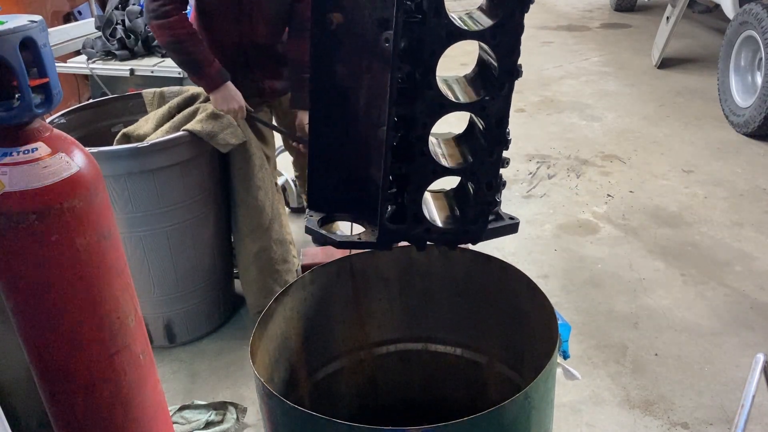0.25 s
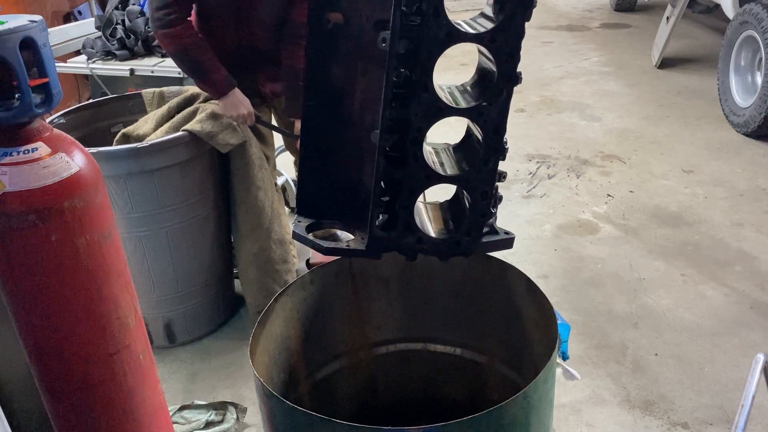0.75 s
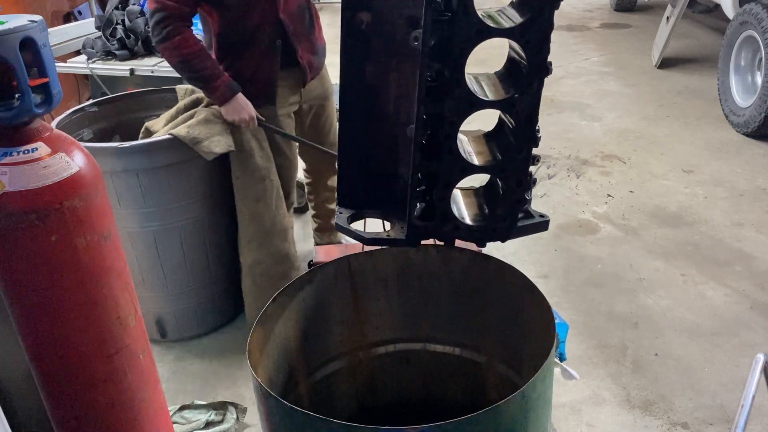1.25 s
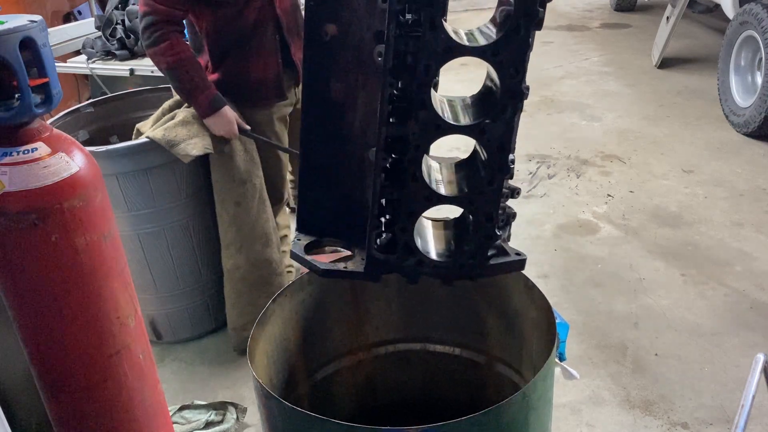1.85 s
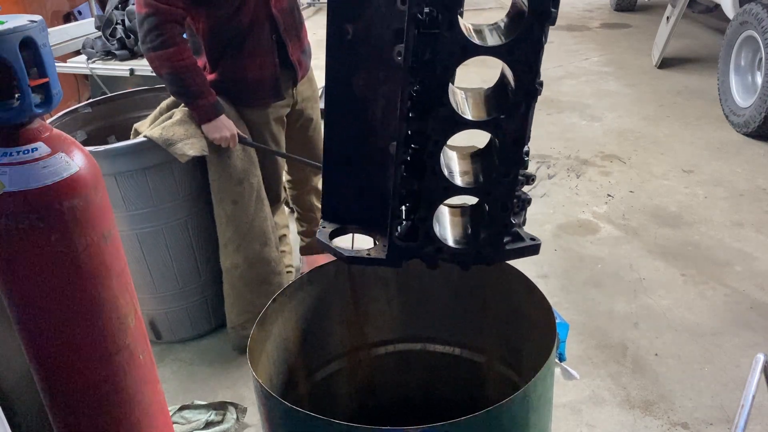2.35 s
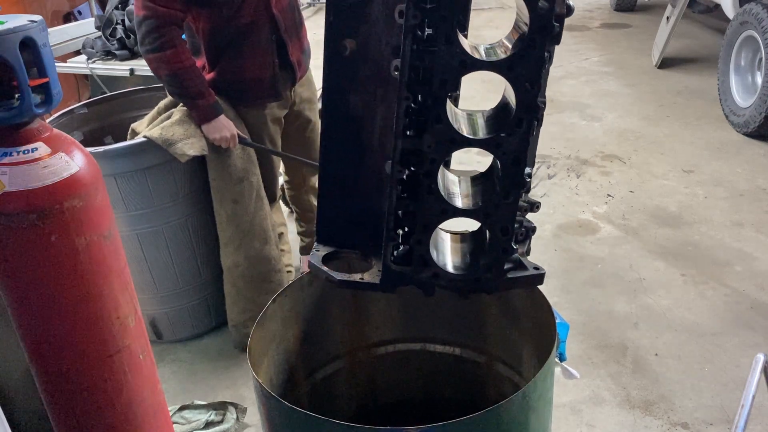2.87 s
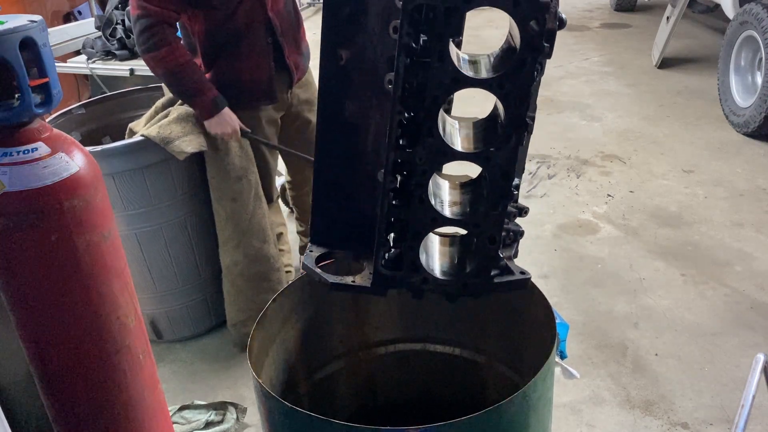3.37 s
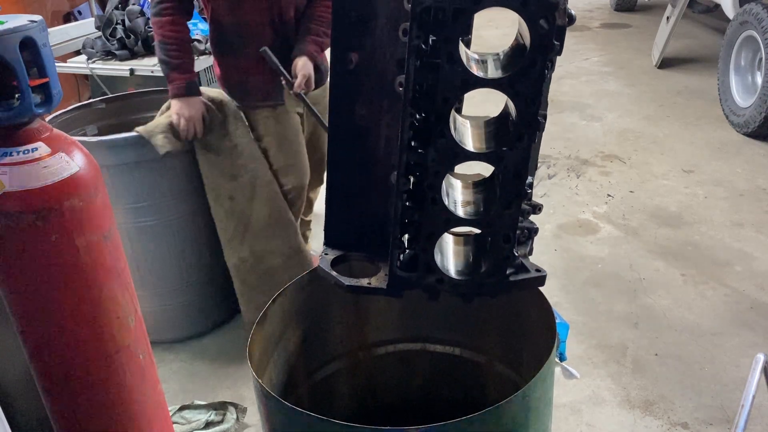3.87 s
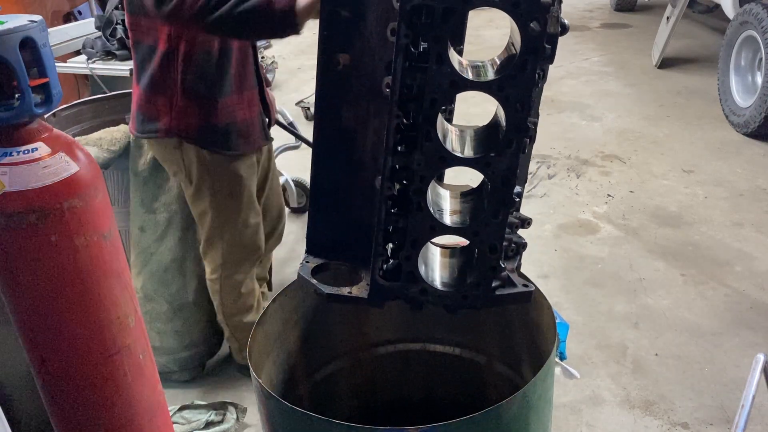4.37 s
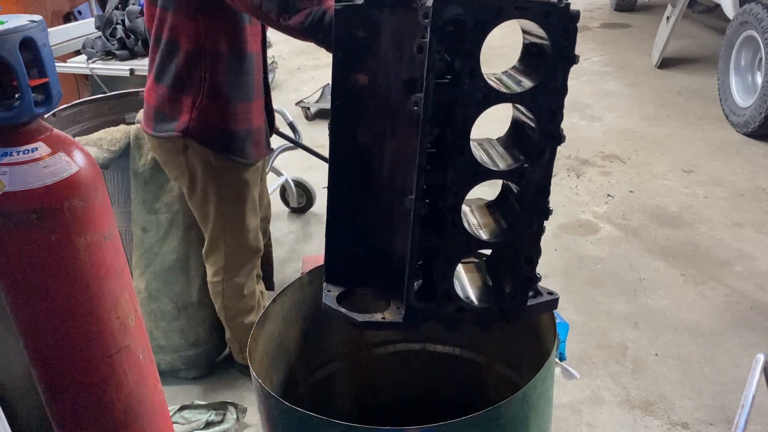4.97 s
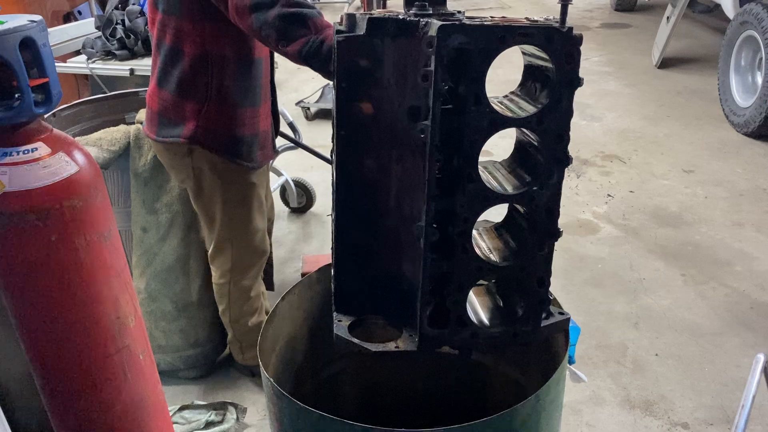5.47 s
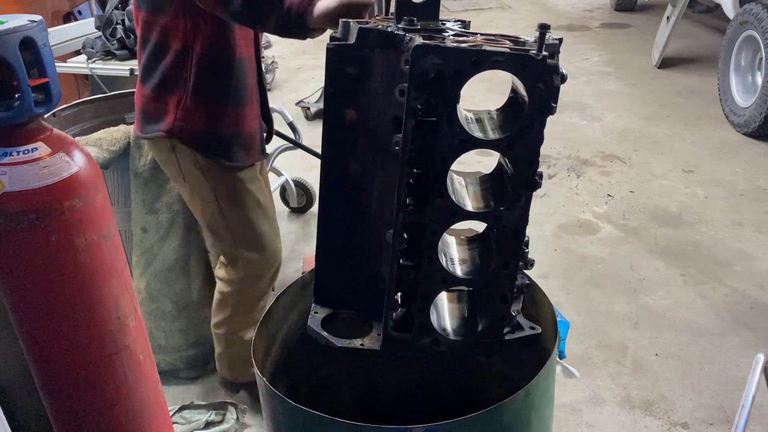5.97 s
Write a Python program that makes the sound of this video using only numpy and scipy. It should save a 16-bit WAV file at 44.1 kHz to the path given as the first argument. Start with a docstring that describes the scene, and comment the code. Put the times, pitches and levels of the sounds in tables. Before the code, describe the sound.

A low throbbing hum, with faint whine, rumble and soft air hiss, runs throughout in a garage with a short echo. At 0.15 s a loaded chain gives a dull clunk, with a weaker one near 0.45. Boots slide lightly on gritty concrete from 0.65 to 1.4, with heel thuds around 1.15 and 1.24. A stronger scuff comes at 1.55, then a cluster of bright chain clacks and a low boom at 1.68-1.82, followed by smaller ticks at 1.96, 2.13 and 2.53. Mostly hum remains until footsteps and scuffs at 3.84-4.34. At 5.31 a heavy block bangs the rim of an empty steel drum, ringing with a deep boom. At 5.58-5.61 it crashes onto the wall, louder and brighter, with a tiny squeal. Muffled judders, booms, chain rattles and boot scuffs continue to about 6.2 while the shell rings down.

```python
"""An engine block hanging from a hoist knocks on the rim of an empty steel drum, crashes against its wall
and judders down it: decaying tones and noise ring the shell, and low tones boom in its bottom.
The loaded chain ticks with bursts of noise and ringing tones; padded contacts knock with a hollow tone.
Boots scuff on gritty concrete in shaped noise and small ringing grains, and thud on the heel.
A throbbing low hum, a faint whine, a rumble and a soft hiss of air run throughout; a garage echoes."""
import sys
import numpy as np
from scipy import signal
from scipy.fft import rfft, irfft, next_fast_len
from scipy.io import wavfile

SR = 44100
rng = np.random.default_rng(int(sys.argv[2]) if len(sys.argv) > 2 else 0)


def wav_out(sig):
    """Save sig, one row per channel (or a flat mono array), as 16-bit PCM at SR to the path in sys.argv[1]."""
    wavfile.write(sys.argv[1], SR, np.round(np.clip(np.atleast_2d(sig).T, -1, 1) * 32767).astype(np.int16))


N = 274743  # length of the scene [samples]
T = np.arange(SR) / SR  # the second that follows an event [s]
BRIEF = T[:SR // 4]  # a quarter second, long enough for a small sound to die [s]
JUDDER_S = 5.65  # from here the block judders down the wall, leaning on it


def drum():
    """The block drags on the steel, so each knock builds up over milliseconds before the shell rings out."""
    # tones of the shell: (frequency [Hz], level when struck on the rim [dB], on the wall [dB])
    shell_modes = [(250, -15, -4), (257, 1, -15), (345, -4, 4), (364, 1, -7), (393, -5, -5), (463, -1, -5),
                   (541, 2, -3), (580, -7, -9), (619, -14, -1.5), (684, -10, -6), (769, -18, -5),
                   (838, -8, -10), (883, -10, -4), (935, -5, -11), (1005, -4, -11), (1130, -5, -3.5),
                   (1190, -10, -18), (1240, -3, -13), (1343, -5, -18), (1436, -3, -4), (1472, -5, -13),
                   (1516, -7, 1), (1538, -9, 0), (1563, -5, -1), (1625, -9, -7), (1690, -9, -9),
                   (1740, -5, -15), (1785, -16, -10), (1840, -13, -10), (1909, -6, -11), (1974, -9, -14),
                   (2014, -6, -4), (2115, -9, -8), (2275, -6, -14), (2444, -18, -12), (2585, -12, -14),
                   (2690, -15, -14), (3243, -19, -17), (3330, -19, -17), (3715, -24, -15), (3797, -17, -24)]
    # crowd of weaker tones, as noise: (frequency [Hz], level per Hz [dB], time to fall 60 dB [s])
    crowd = [(151, -29, 0.19), (322, 8, 0.33), (670, -3, 0.97), (1450, -1, 0.4), (2090, 3, 0.16),
             (3290, -9, 0.19), (4940, -18, 0.17), (7150, -26.5, 0.13), (11900, -59, 0.12)]
    wall_from_s, rim_edge_hz = 5.5, 3840  # a blow on the rolled rim has less treble than one on the wall
    crowd_db = -4.5  # relative to the tones
    lean_t60_s = 0.92  # extra damping once the block rests against the shell

    def t60(hz):
        """Low tones ring longest; above the knee at 2400 Hz the ringing shortens faster."""
        return 0.66 * (1000 / hz) ** 0.14 / np.sqrt(1 + (hz / 2400) ** 4)

    rim = ring([(hz, db, t60(hz)) for hz, db, _ in shell_modes], T)
    wall = ring([(hz, db, t60(hz)) for hz, _, db in shell_modes], T)
    out = np.zeros((2, N))
    for s, db, rise_ms, tilt_db in contacts():
        on_rim = s < wall_from_s
        tones = strike(rim if on_rim else wall, spread=0.42, scatter_db=0.5, detune_hz=2.35)
        shell = level(tones, 0, span_s=0.04)
        shell = shell + level(wash(crowd, side=0.72), crowd_db, span_s=0.19)
        if on_rim:
            shell = filtered(shell, lambda hz: 1 / np.sqrt(1 + (hz / rim_edge_hz) ** 6))
        if s >= JUDDER_S:
            shell = shell * undb(-60 * T / lean_t60_s)
        push = np.minimum(1000 * T / rise_ms, 1)
        add(out, s, level(tilted(shell * push, tilt_db), db, span_s=0.053))
    return out + squeal()


def contacts():
    """Every touch of block on drum; the hard knocks graze first and bite a second time just after."""
    # blows on rim, then wall: (time [s], level [dB], rise [ms], treble tilt [dB per octave])
    knocks = [(5.309, -30, 7.5, -0.74), (5.583, -30, 22.2, -0.5), (5.612, -36.5, 9.6, 0.5),
              (5.666, -38, 2.2, -2), (5.697, -49, 2.8, 1), (5.722, -38, 4, -6.5), (5.768, -46.5, 3.6, -5.5),
              (5.822, -48.5, 3, -2.5), (5.99, -46, 4, -4.5), (6.15, -43.5, 8, -8.5)]
    graze_lead, graze_db, graze_tilt_db = 1.4, -9, -0.5  # lead in rise times; the rest relative to the knock
    bite_s, bite_rise_ms = 0.016, 3.6  # delay after the knock, and build-up
    bite_db, bite_tilt_db = -11, 2.5  # relative to the knock
    for s, db, rise_ms, tilt_db in knocks:
        yield s, db, rise_ms, tilt_db
        if s < JUDDER_S:
            lead_ms = graze_lead * rise_ms
            yield s - lead_ms / 1000, db + graze_db, lead_ms, tilt_db + graze_tilt_db
            yield s + bite_s, db + bite_db, bite_rise_ms, tilt_db + bite_tilt_db


def squeal():
    """The block squeals on the steel as it slips off the rim: a narrow band of noise swells and fades."""
    # the one squeal: (time [s], length [s], pitch [Hz], level [dB])
    s, length, hz, db = (5.55, .075, 1975, -46)
    out = np.zeros((2, N))
    friction = band(noise(len(BRIEF), side=0.5), hz * 0.98, hz * 1.02)
    swell = np.sin(np.pi * np.minimum(BRIEF / length, 1))
    add(out, s, level(friction * swell, db, length))
    return out


def booms():
    """Each jolt sets the drum's bottom swinging."""
    # jolts: (time [s], level [dB])
    jolts = [(1.758, -33), (5.315, -28.5), (5.712, -30), (5.889, -30.5), (6.16, -29)]
    # tones of the drum's bottom: (frequency [Hz], level [dB], time to fall 60 dB [s])
    bottom = [(79.7, 3, 0.19), (243.4, -11.5, 0.17)]
    out = np.zeros((2, N))
    for s, db in jolts:
        add(out, s, thud(bottom, db))
    return out


def chain():
    """A link grinds over its neighbour for a few milliseconds, and chain and hook ring briefly."""
    # links slipping under load:
    # (time [s], level [dB], treble tilt [dB per octave], slip [ms], ringing relative to grinding [dB])
    slips = [(0.145, -39.5, -4.5, 6, -5.5), (0.456, -44.5, -4.5, 2.7, -12.5), (.824, -45.5, -7, 5.3, 2),
             (1.209, -46.5, 10, 7.5, 4), (1.38, -44, -5.5, 16, -13), (1.44, -52, 2, 26, 10),
             (1.678, -36.5, -0.5, 11.4, 0.5), (1.754, -42.5, -2, 1.23, 1), (1.818, -35, 1, 10.7, -1.5),
             (1.96, -41, -2.5, 9.8, 2), (2.135, -53, 5, 3.7, 0), (2.529, -52.5, 0, 3.4, -1),
             (3.048, -57, -2, 10, 6), (5.731, -47.5, 2, 7.3, 4), (5.779, -42, -2.5, 16.6, -8.5),
             (6.111, -43.5, 9, 21, 3)]
    # tones of chain and hook: (frequency [Hz], level [dB], time to fall 60 dB [s])
    chain_modes = [(494, -11, 0.17), (778, -6.5, 0.049), (942, -3.5, 0.13), (1057, -15, 0.08),
                   (1317, -11, 0.22), (1400, -0.5, 0.044), (1530, -2, 0.087), (1763, -5.5, 0.08),
                   (1880, -9, 0.11), (2274, -5, 0.11), (2690, -2, 0.035), (2772, -7, 0.065),
                   (2930, -6, 0.03), (3197, -3.5, 0.051), (3830, -5, 0.056), (4030, -7, 0.033),
                   (4600, -21.5, 0.022), (5000, -18, .04), (6830, -6, 0.062)]
    fade_s = 0.005  # how fast the grinding dies after the slip
    load_share = 0.28  # time constant in which a link takes up the load, as a share of its slip
    edge_hz, snap_hz_ms = 2140, 9150  # treble edge of a long slip; a quick one adds snap_hz_ms / slip
    out, swings = np.zeros((2, N)), ring(chain_modes, BRIEF)
    for s, db, tilt_db, ms, ring_db in slips:
        slip = np.exp(-np.maximum(BRIEF - ms / 1000, 0) / fade_s)
        grind = band(noise(len(BRIEF), side=0.83), 240, 7500) * slip
        grind = grind * flutter(len(BRIEF), rate_hz=360, depth_db=4.0)
        tones = strike(swings, spread=1.0, scatter_db=5.5, detune_hz=40.7)
        tick = level(grind, 0, span_s=0.026) + level(tones, ring_db, span_s=0.04)
        tick = tilted(tick * (1 - np.exp(-1000 * BRIEF / (load_share * ms))), tilt_db)
        top_hz = edge_hz + snap_hz_ms / ms
        tick = filtered(tick, lambda hz: 1 / np.sqrt(1 + (hz / top_hz) ** 8))  # softer contact, less treble
        add(out, s, level(tick, db, span_s=0.026))
    return out


def clinks(count=3):
    """A free link chatters against its neighbour in a few quick touches and is damped at once."""
    # single links as the chain shifts: (time [s], pitch [Hz], level before sharing among the touches [dB])
    free_links = [(0.825, 2873, -52.5), (1.21, 3680, -60), (1.442, 2830, -58.5), (1.75, 2650, -40.5),
                  (1.820, 2900, -47.5), (1.963, 2890, -67), (2.134, 2646, -51.5), (2.531, 2697, -49),
                  (3.046, 2635, -62), (4.29, 4090, -69), (5.664, 2970, -56.5), (5.787, 2600, -54),
                  (5.841, 3410, -66)]
    # tones of a free link: (multiple of its pitch, level [dB], time to fall 60 dB [s])
    link_modes = [(.81, -5.5, 0.045), (.93, -6.5, 0.062), (0.976, 0.5, 0.022), (1.008, 3, 0.032),
                  (1.06, -5, 0.043), (1.152, -13, 0.023), (1.38, -13.5, 0.029), (1.52, -17.5, 0.037),
                  (1.86, -12.5, 0.024), (2.558, -19, 0.021)]
    gap_s, loss_db = 0.0052, -1  # from one touch to the next
    out = np.zeros((2, N))
    for s, hz, db in free_links:
        swings = ring([(hz * ratio, mode_db, t60) for ratio, mode_db, t60 in link_modes], BRIEF)
        for k in range(count):
            touch = strike(swings, spread=0.24, scatter_db=2.0, detune_hz=50.0)
            touch = touch * (1 - np.exp(-BRIEF / 0.005))
            add(out, s + k * gap_s, level(touch, db + k * loss_db, span_s=0.022) / np.sqrt(count))
    return out


def clunks(rise_s=0.0058):
    """A padded contact sounds a hollow body for a few dozen milliseconds."""
    # knocks as boots, block and hoist take the weight: (time [s], pitch [Hz], level [dB])
    hollow_knocks = [(0.148, 620, -39), (0.151, 419, -39.5), (0.459, 1334, -48), (0.461, 613, -54),
                     (1.112, 530, -51), (1.160, 524, -44), (1.243, 497, -47.5), (1.298, 550, -50),
                     (1.583, 432, -42), (1.689, 423, -40), (1.762, 327, -42.5), (3.849, 1366, -56.5),
                     (3.955, 562, -41), (4.02, 538, -45.5), (4.172, 487, -51.5), (5.586, 342, -38),
                     (5.607, 384, -33.5), (5.724, 259, -35), (5.822, 426, -40), (6.020, 650, -47),
                     (6.12, 956, -42), (6.120, 670, -45.5)]
    # tones of the hollow body: (multiple of the pitch, level [dB], time to fall 60 dB [s])
    body_modes = [(0.619, -7.5, .05), (.9, -10.5, 0.074), (0.999, -3.5, 0.08), (1.202, 1, 0.028),
                  (1.549, -14, 0.034)]
    out = np.zeros((2, N))
    for s, hz, db in hollow_knocks:
        swings = ring([(hz * ratio, mode_db, t60) for ratio, mode_db, t60 in body_modes], BRIEF)
        knock = strike(swings, spread=0.18, scatter_db=8.0, detune_hz=11.0)
        add(out, s, level(knock * np.minimum(BRIEF / rise_s, 1), db, span_s=0.011))
    return out


def boots():
    """Slides are loudest midway, footfalls scuff briefly and land on the heel, and coarse grains crack."""
    # boots sliding on concrete: (time [s], length [s], sole level [dB], rasp level [dB])
    slides = [(0.025, 0.026, -48, -55.5), (0.655, 0.066, -49.5, -60.5), (0.739, 0.024, -51.5, -57.5),
              (0.8, 0.078, -57, -52), (0.938, 0.051, -52, -61), (1.019, 0.17, -50, -53.5),
              (1.216, 0.034, -62, -50), (1.321, 0.12, -59, -56), (1.531, 0.13, -43.5, -44),
              (5.924, 0.051, -43.5, -46), (6.056, 0.11, -41.5, -49)]
    # footfalls: (time [s], sole level [dB], rasp level [dB], heel level [dB])
    steps = [(1.153, -42.5, -53.5, -36), (1.237, -43, -57, -38.5), (1.582, -53, -58, -39),
             (3.836, -45.5, -55.5, -54), (3.954, -45.5, -47.5, -50), (4.022, -43, -52, -35),
             (4.091, -48, -70, -51.5), (4.169, -48, -60.5, -37.5), (4.338, -52.5, -65, -38)]
    # tones of the heel on the floor: (frequency [Hz], level [dB], time to fall 60 dB [s])
    heel_modes = [(99, -4.5, 0.049), (214, -13, 0.046)]
    # coarse grains cracking under a boot: (time [s], level [dB])
    cracks = [(1.089, -58), (1.131, -55.5), (1.322, -63.5), (1.338, -63), (1.390, -64), (1.737, -52),
              (3.739, -71.5), (3.989, -64.5), (4.532, -67.5), (6.02, -60), (6.026, -59)]
    heel_lag_s, crack_fade_s = 0.00804, 0.004
    out = np.zeros((2, N))
    for s, length, sole_db, rasp_db in slides:
        add(out, s, scuff(length, attack_s=0.0064, release_s=0.037, sole_hz=389, sole_db=sole_db,
                          rasp_db=rasp_db, grit_db=-16, rough_db=0, swell_db=8.5))
    for s, sole_db, rasp_db, heel_db in steps:
        add(out, s, scuff(length=0.019, attack_s=0.004, release_s=0.02, sole_hz=512, sole_db=sole_db,
                          rasp_db=rasp_db, grit_db=-11, rough_db=1.5))
        add(out, s + heel_lag_s, thud(heel_modes, heel_db))
    for s, db in cracks:
        snap = band(noise(len(BRIEF), side=0.97), 650, 7400)
        snap = snap * np.exp(-BRIEF / crack_fade_s) * np.minimum(BRIEF / 0.0013, 1)
        add(out, s, level(tilted(snap, tilt_db=-4), db, span_s=0.033))
    return out


def scuff(length, attack_s, release_s, sole_hz, sole_db, rasp_db, grit_db, rough_db, swell_db=0):
    """The sole sticks and slips with a hollow rub while fine grit cracks in grains of unequal size."""
    grain_spread_db, sand_db = 3.5, -1.5  # unevenness of the grit; rolling sand relative to rasp_db
    n = SR // 2
    t = T[:n]
    press = np.minimum(t / attack_s, 1) * np.exp(-np.maximum(t - length, 0) / release_s)
    press = press * undb(swell_db * np.sin(np.pi * np.minimum(t / length, 1)))
    press = press * flutter(n, rate_hz=73.5, depth_db=5.0)
    grains = noise(n, side=0.93) * undb(grain_spread_db * np.minimum(rng.exponential(size=n), 6))
    rub = noise(n, side=1.0)
    sole = band(rub, sole_hz * 0.91, sole_hz * 1.122) + undb(-0.5) * band(rub, 210, 590)
    rasp = band(band(grains, 1100, 2680), 700, 2700) * flutter(n, rate_hz=83, depth_db=rough_db)
    grit = band(band(grains, 3100, 6400), 1800, 9200) * flutter(n, rate_hz=110, depth_db=rough_db)
    layers = ((sole, sole_db), (rasp, rasp_db - 2.0), (grit, rasp_db + grit_db))
    rolling = level(sand(n), rasp_db + sand_db) * press / press.max()
    return rolling + sum(level(x * press, db, length) for x, db in layers)


def sand(n, count=160):
    """Coarse grains roll under the sole, each ringing a few cycles at its own pitch."""
    low_hz, high_hz, ring_cycles = 703, 2336, 7.4  # range of pitches; cycles in which a grain fades
    when, pitch, size, ear = rng.uniform(size=(count, 4)).T[:, :, None]
    hz = low_hz * (high_hz / low_hz) ** pitch
    cycles = hz * T[:SR // 40]
    swings = undb(-14 * size) * np.exp(2j * np.pi * cycles - cycles / ring_cycles)
    swings = swings * np.minimum(cycles, 1)
    starts = (when[:, 0] * n).astype(int)
    lags = np.pi * (ear[:, 0] - 0.5)  # phase of the right ear against the left
    out = np.zeros((2, n + SR))
    for start, swing, lag in zip(starts, swings, lags):
        out[:, start:start + len(swing)] += [swing.imag, (swing * np.exp(1j * lag)).imag]
    return out[:, :n]


def background():
    """Hum, whine, hiss of air and a low rumble of noise, all a little to the right."""
    rumble = level(band(noise(N, side=0.25), 25, 75), -49.0)
    balance_db = -0.74  # left against right
    return (hum() + whine() + air() + rumble) * undb(np.array([[balance_db], [-balance_db]]) / 2)


def hum():
    """A low throbbing tone with a weaker upper one."""
    low = throb(hz=85.6, turn_hz=99.65, width_s=0.0078, shape=2.95, first_s=0.02664,
                wander=1.215, scatter_db=0.5)
    upper = throb(hz=179.6, turn_hz=176.3, width_s=0.0081, shape=2.1, first_s=0.0039,
                  wander=1.906, scatter_db=0.5)
    return level(low, -39.0) + level(upper, -56.0)


def throb(hz, turn_hz, width_s, shape, first_s, wander, scatter_db):
    """A tone in evenly spaced swells; its phase runs on at turn_hz between them and slips by chance."""
    rate = 37.5  # swells per second
    t = np.arange(N) / SR - first_s
    slips, sizes = rng.standard_normal((int(N / SR * rate) + 8, 2)).T
    phase = np.cumsum(2 * np.pi * turn_hz / rate + wander * slips)
    out = np.zeros(N)
    for neighbour in (-1, 0, 1):  # swells overlap, so add the nearest three
        k = np.round(t * rate).astype(int) + neighbour
        age = t - k / rate
        swell = undb(scatter_db * sizes[k]) * np.exp(-0.5 * np.abs(age / width_s) ** shape)
        out += swell * np.cos(2 * np.pi * hz * age + phase[k])
    return out


def whine():
    """Narrow, slightly wavering tones, made by filtering noise to thin bands."""
    # faint steady tones: (frequency [Hz], width [Hz], level [dB])
    whine_tones = [(605, 6.6, -69), (726.3, 19, -68), (1016, 30, -70), (1234, 30, -70.5), (2134, 33, -72.5)]
    source = noise(N, side=0.8)
    out = np.zeros((2, N))
    for hz, width, db in whine_tones:
        out += level(filtered(source, lambda f: 1 / (1 + (2 * (f - hz) / width) ** 2)), db)
    return out


def air():
    """Moving air hisses: noise shaped by frequency."""
    # balance of the hiss: (frequency [Hz], relative level per Hz [dB])
    air_curve = [(20, 1), (130, 19), (250, 2.5), (370, -5.5), (520, 3), (680, -2), (900, 0.5), (1230, -2.5),
                 (1620, -11), (2000, -2.5), (2330, -7), (2650, -19), (4200, -26.5), (6200, -38),
                 (9000, -52), (15000, -50.5)]
    hz, db = np.transpose(air_curve)
    hiss = filtered(noise(N, side=0.93), lambda f: undb(np.interp(np.log(f), np.log(hz), db)))
    return level(hiss, -47.5)


def undb(db):
    """Turn decibels into gain."""
    return np.exp(np.asarray(db) * (np.log(10) / 20))


def level(x, db, span_s=None):
    """Scale to an rms (average) level, taken over the first span_s seconds or over all."""
    head = x if span_s is None else x[..., :int(span_s * SR)]
    return x * undb(db) / np.sqrt(np.mean(head ** 2))


def filtered(x, gain):
    """Filter by a function of frequency."""
    n = x.shape[-1]
    size = next_fast_len(n + 4096)
    hz = np.maximum(np.arange(size // 2 + 1) * SR / size, 1)
    return irfft(rfft(x, size) * gain(hz), size)[..., :n]


def band(x, low_hz, high_hz):
    """Keep a band of frequencies, with moderate slopes."""
    edges = [low_hz, min(high_hz, SR / 2 - 1)]
    return signal.sosfilt(signal.butter(2, edges, "band", fs=SR, output="sos"), x)


def tilted(x, tilt_db):
    """Tilt by so many dB an octave about 1 kHz, with no further change below 250 Hz."""
    return filtered(x, lambda hz: undb(tilt_db * np.log2(np.maximum(hz, 250) / 1000)))


def noise(n, side):
    """Stereo noise; side is the weight of the part in which left and right oppose."""
    mid, difference = rng.standard_normal((2, n))
    return mid + side * difference * np.array([[1], [-1]])


def flutter(n, rate_hz, depth_db):
    """The uneven gain of surfaces that stick and slip."""
    points = np.clip(rng.standard_normal(400), -2, 2)
    return undb(depth_db * np.interp(np.arange(n) / SR * rate_hz, np.arange(400), points))


def ring(modes, t):
    """One decaying swing for each mode, a tone at which a body rings."""
    hz, db, t60 = np.transpose(modes)[:, :, None]
    return undb(db - 60 * t / t60) * np.exp(2j * np.pi * hz * t)


def strike(swings, spread, scatter_db, detune_hz):
    """Each blow lands on a new spot: new phases and strengths, and a slight detuning by the contact."""
    count, n = swings.shape
    phase = rng.uniform(0, 2 * np.pi, count) + spread * rng.standard_normal((2, count))  # parts the ears
    weights = undb(scatter_db * rng.standard_normal(count)) * np.exp(1j * phase)
    tones = np.einsum("em,mt->et", weights, swings)  # sum of the modes for each ear
    shift_hz = detune_hz * rng.uniform(-1.22, 1)
    return (tones * np.exp(2j * np.pi * shift_hz * T[:n])).imag


def thud(modes, db, rise_s=0.0073):
    """A soft heavy contact swings low resonances for a few cycles."""
    swing = ring(modes, T).imag.sum(axis=0) * np.minimum(T / rise_s, 1)
    return level(swing, db, span_s=0.019)[None]


def wash(bands, side):
    """Crowded modes that blur together: noise that dies at its own pace in each band."""
    hz, db, t60 = np.transpose(bands)
    log_hz = np.log(np.maximum(np.arange(SR // 2 + 1), 1))
    source = rfft(noise(SR, side)) * undb(np.interp(log_hz, np.log(hz), db))
    out = np.zeros((2, SR))
    for share, decay in zip(np.eye(len(hz)), t60):  # neighbouring bands cross-fade
        out += irfft(source * np.interp(log_hz, np.log(hz), share), SR) * undb(-60 * T / decay)
    return out


def add(out, s, x):
    """Mix x in at time s."""
    i = int(s * SR)
    out[:, i:i + x.shape[1]] += x[:, :N - i]


def narrowed(x, bass_db=-9, parting_hz=800):
    """Long waves reach left and right almost alike, so their difference is reduced in the bass."""
    mid, side = (x[0] + x[1]) / 2, (x[0] - x[1]) / 2
    side = filtered(side, lambda hz: undb(bass_db / (1 + (hz / parting_hz) ** 2)))
    return np.array([mid + side, mid - side])


def scene():
    """All the handling sounds share the garage's short echo, over the background."""
    # echo of the garage: (frequency [Hz], level [dB], time to fall 60 dB [s])
    garage = [(100, -2, 0.99), (476, -1.5, 0.48), (1470, -4, 0.28), (4000, -6.5, 0.28), (11600, -2, 0.18)]
    direct = drum() + booms() + chain() + clinks() + clunks() + boots()
    room = wash(garage, side=0.94) * np.clip((T - 0.004) / 0.0098, 0, 1)  # starts after 4 ms
    room = room / np.sqrt(np.sum(room ** 2) / 2)
    echo = undb(-11) * signal.fftconvolve(direct, room, axes=1)[:, :N]
    return narrowed(direct + echo) + background()


def record(dry):
    """A steep filter removes the treble above 15.2 kHz."""
    return signal.sosfilt(signal.ellip(8, 0.2, 70, 15200, fs=SR, output="sos"), dry)


dry = scene()
out = record(dry)
wav_out(out)
```